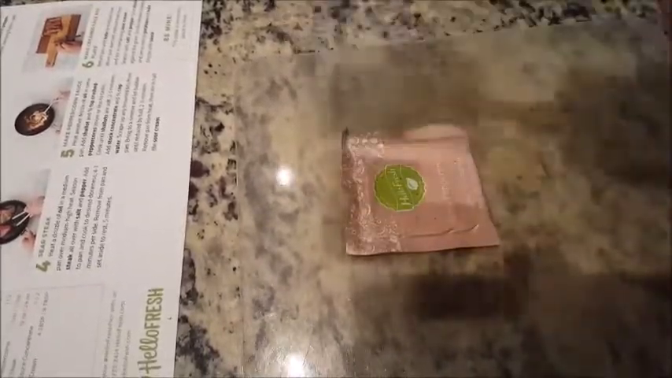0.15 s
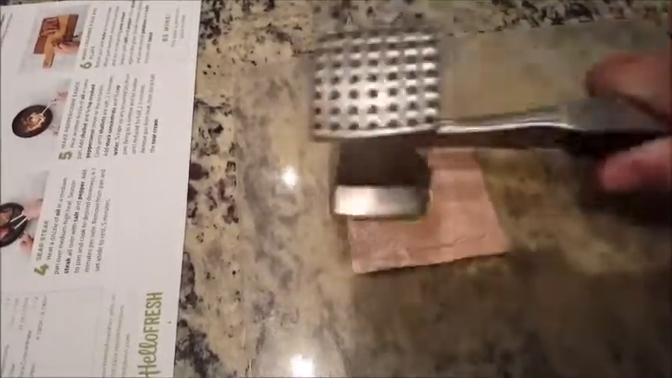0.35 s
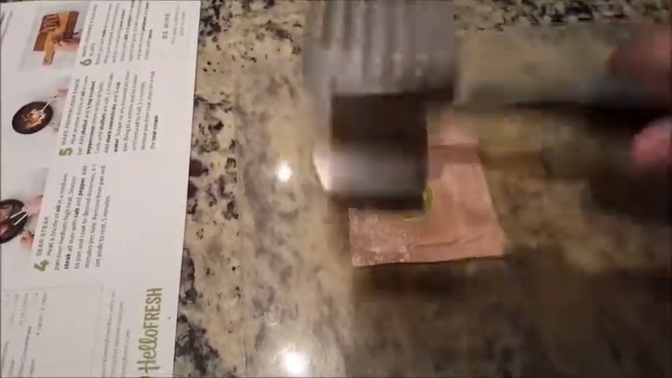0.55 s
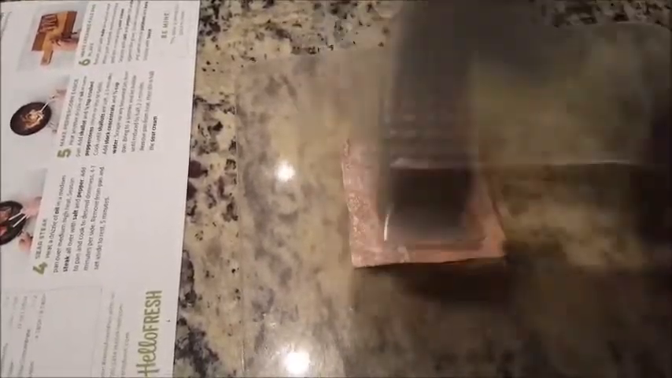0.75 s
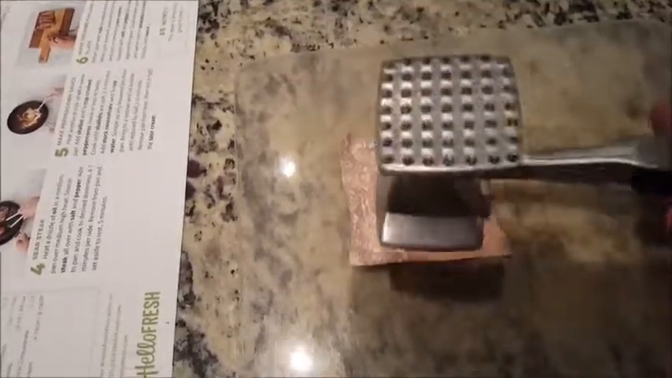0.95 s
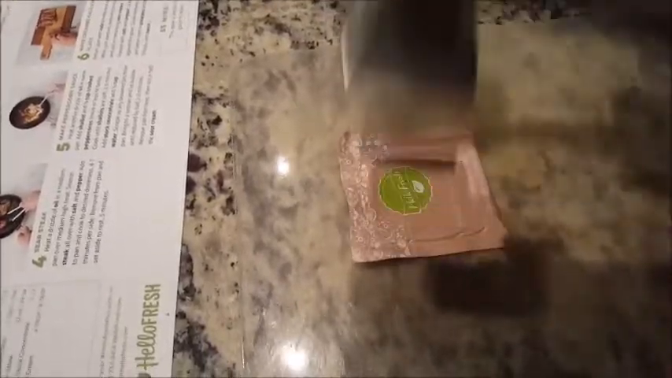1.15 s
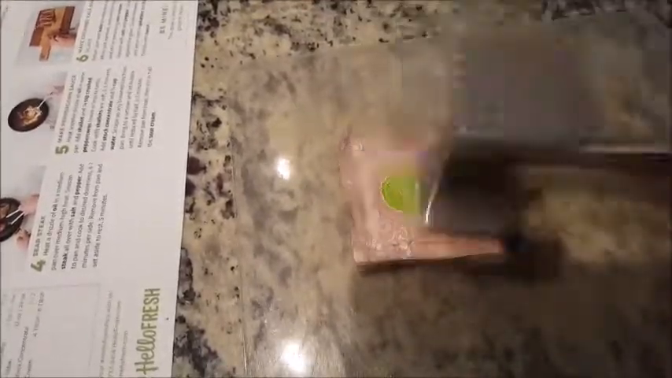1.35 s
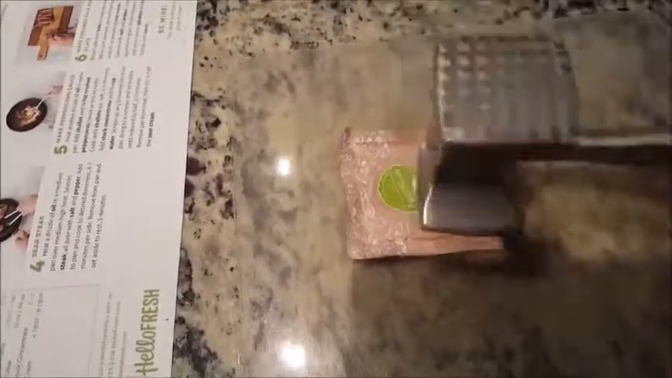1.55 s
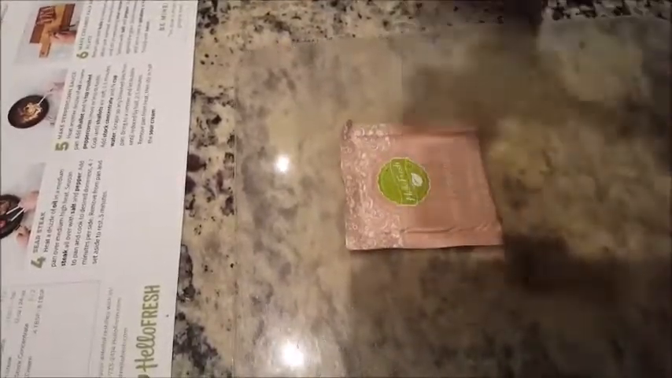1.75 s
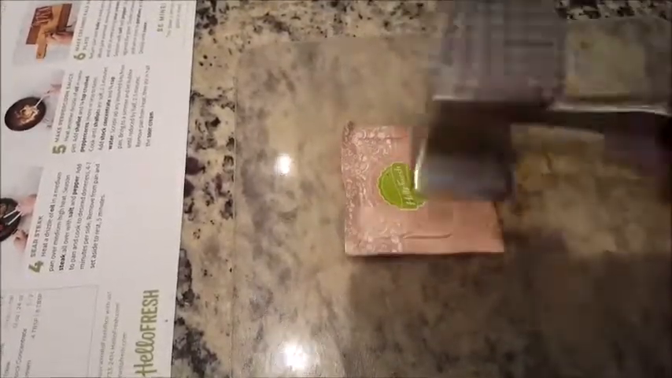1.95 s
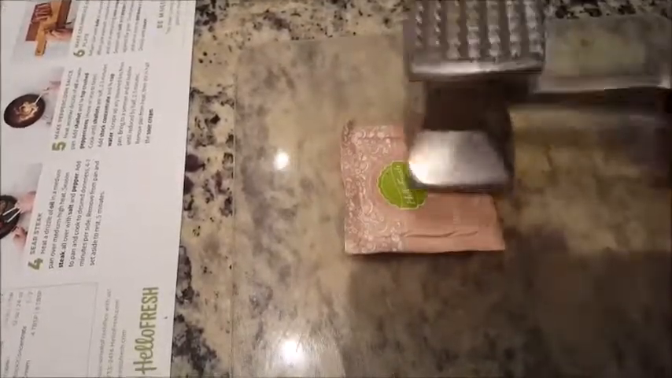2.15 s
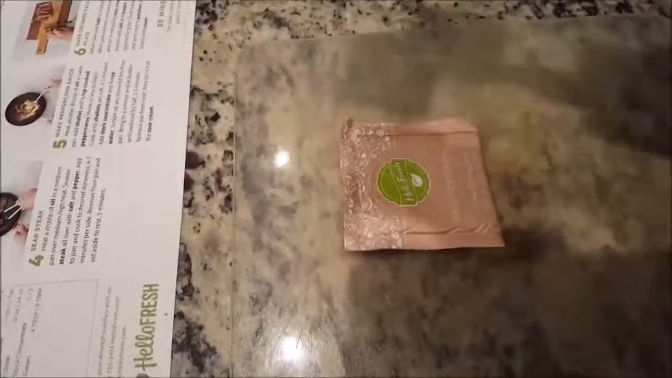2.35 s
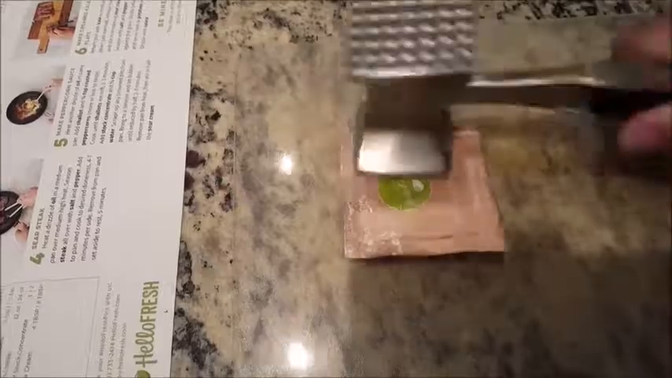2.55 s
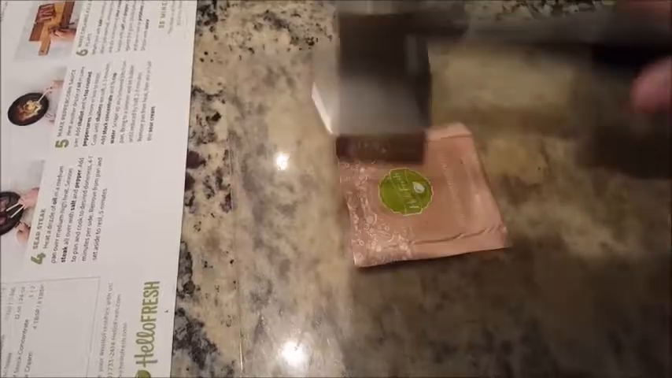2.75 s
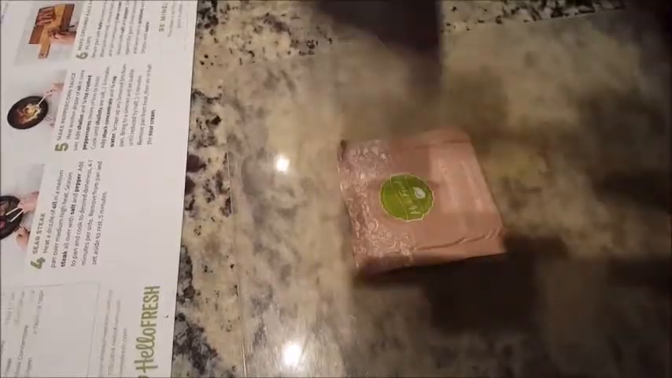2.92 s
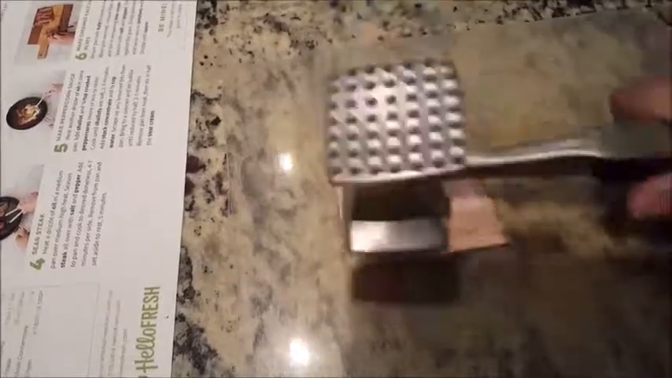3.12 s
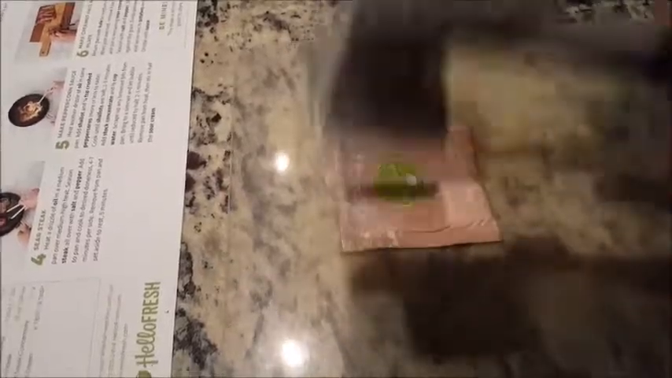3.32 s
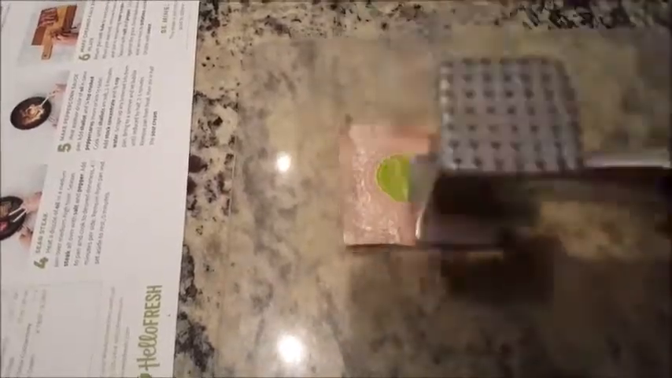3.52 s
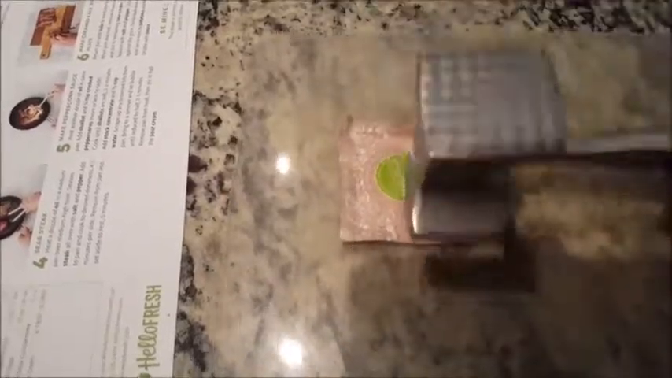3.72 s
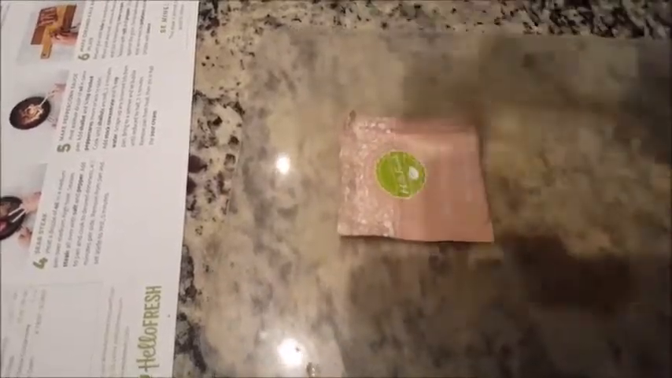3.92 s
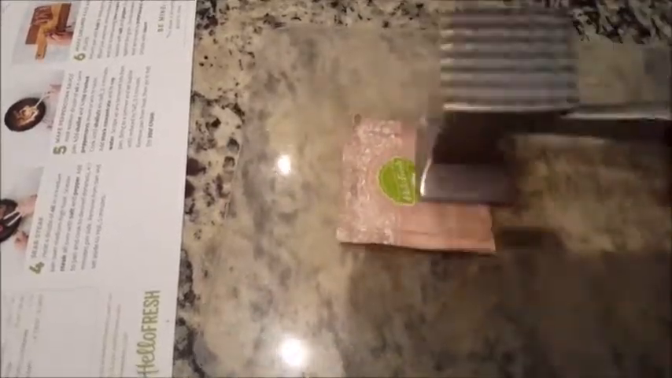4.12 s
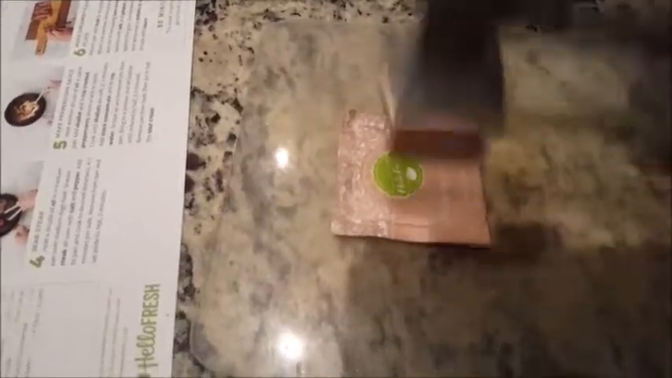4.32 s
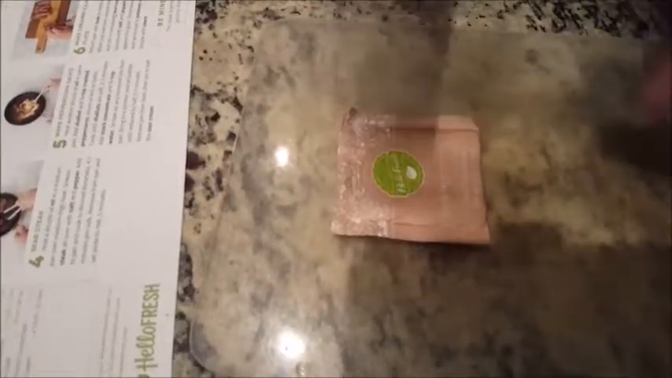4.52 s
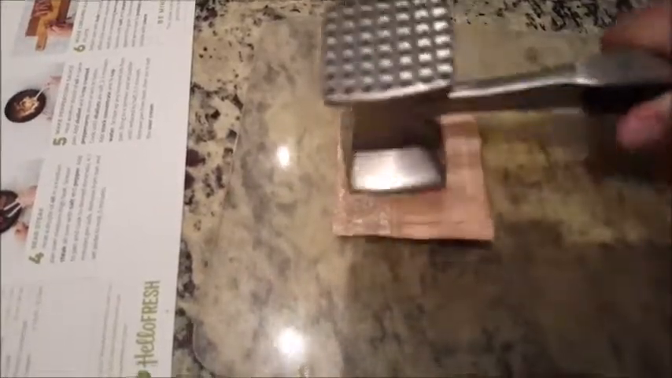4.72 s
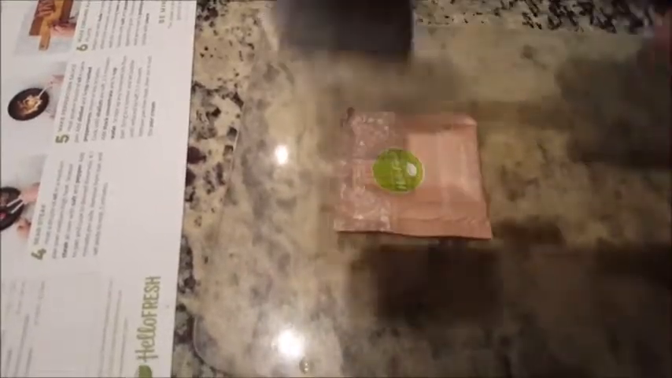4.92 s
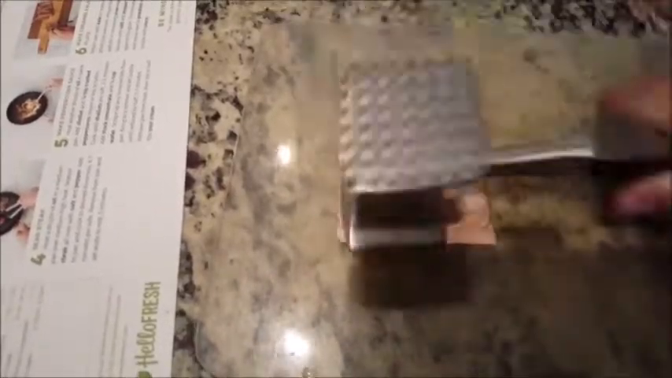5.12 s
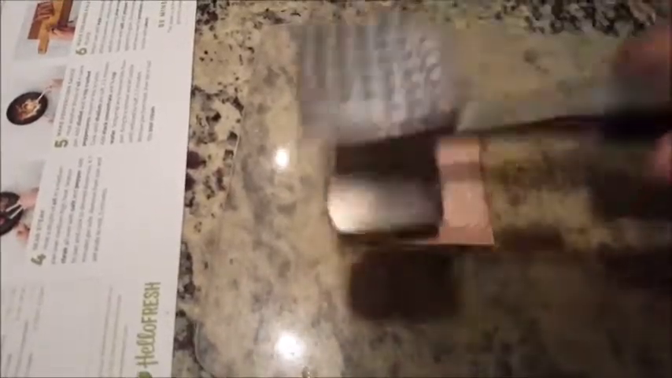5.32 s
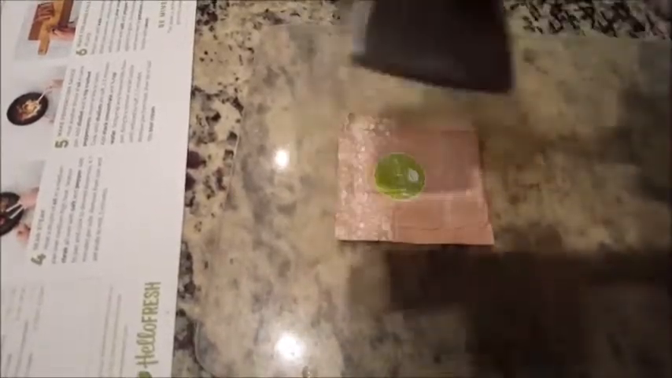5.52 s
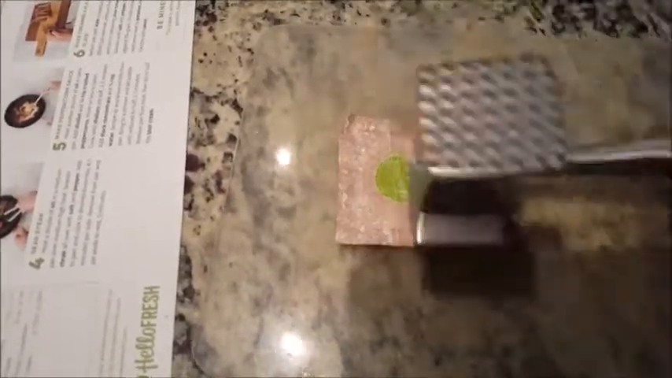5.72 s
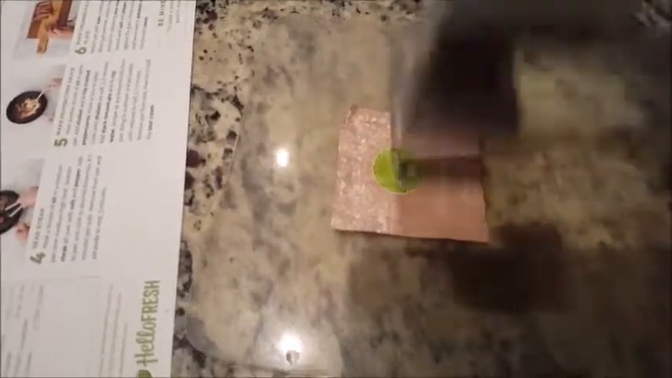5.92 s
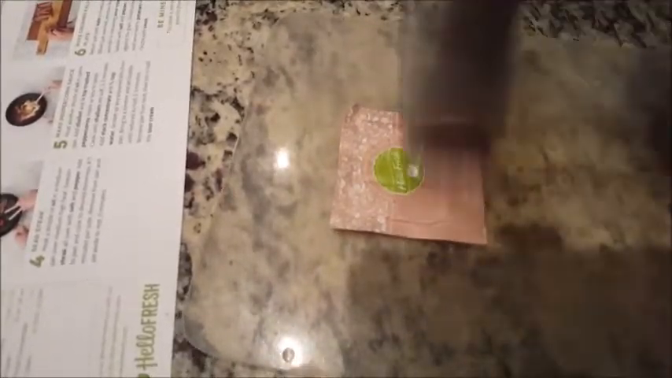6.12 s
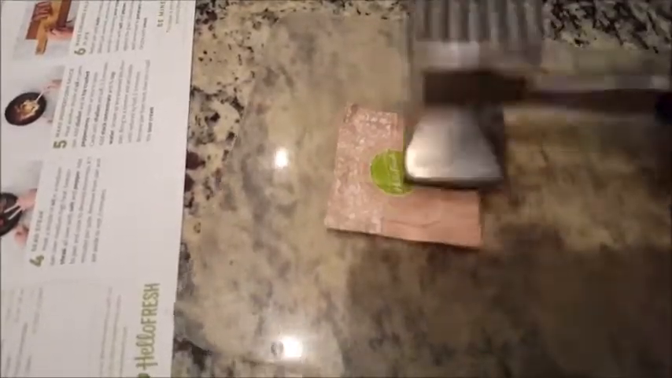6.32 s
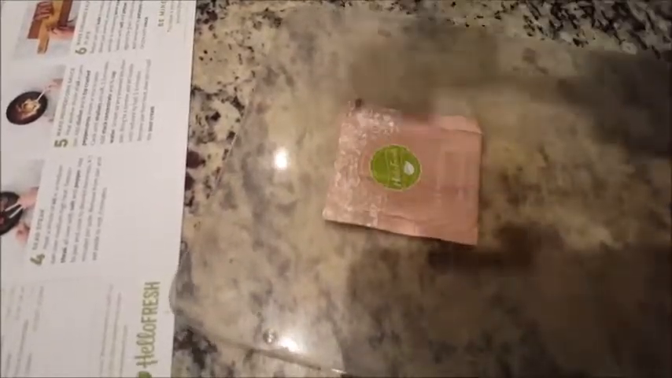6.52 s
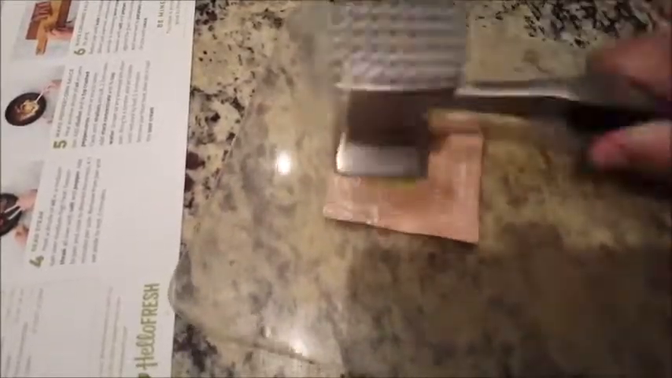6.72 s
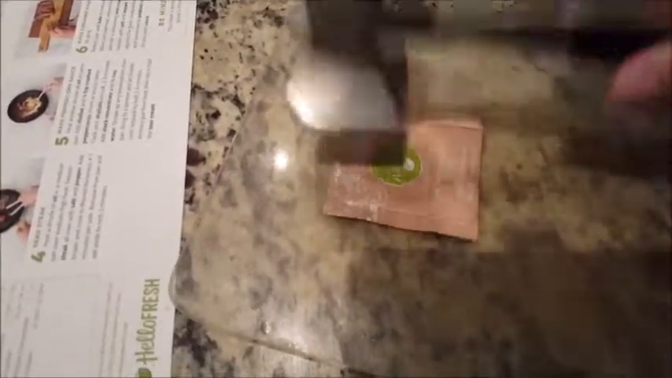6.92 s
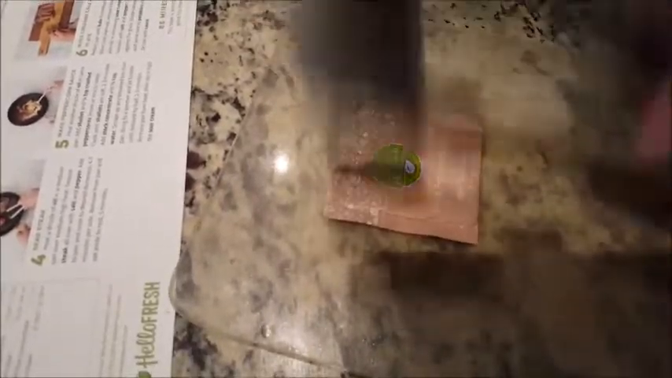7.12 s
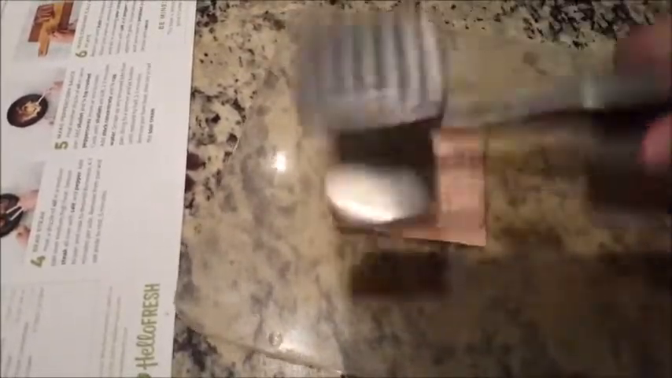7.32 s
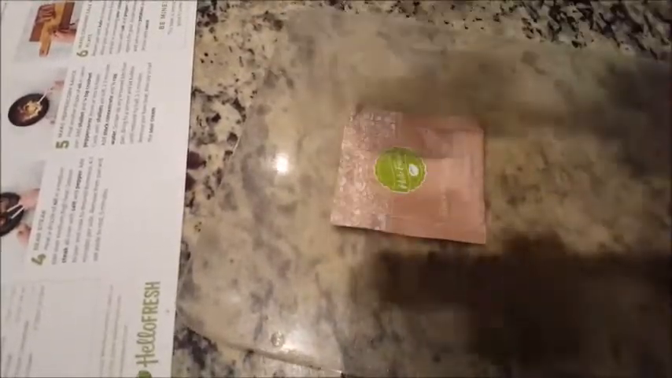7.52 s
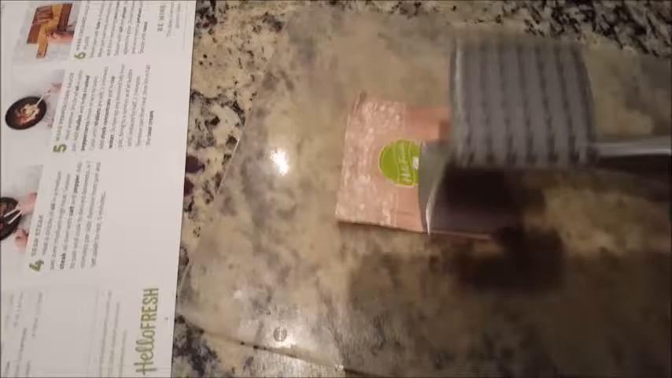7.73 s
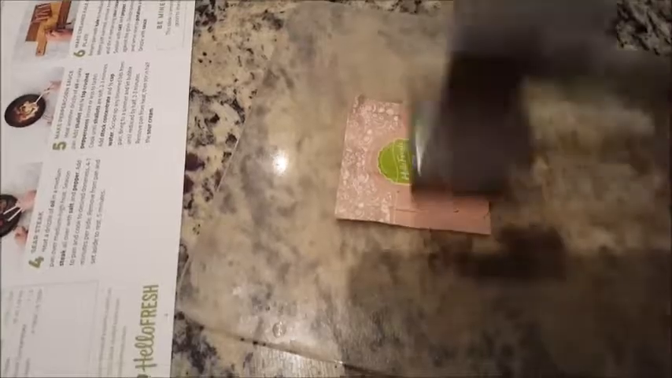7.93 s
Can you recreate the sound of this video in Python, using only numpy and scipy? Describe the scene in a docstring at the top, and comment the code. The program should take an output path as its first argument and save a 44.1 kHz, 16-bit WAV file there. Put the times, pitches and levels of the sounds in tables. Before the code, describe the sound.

Steady, heavy mallet blows crack peppercorns inside a paper packet on a stone slab, each knock ringing briefly in a bare, reflective kitchen.

```python
"""A metal mallet pounds a paper packet of peppercorns on a stone counter in a bare kitchen.
Each blow: filtered noise bursts give the squeezed packet and the cracking corns, two decaying sines the head.
The slab knocks in decaying mode pairs, and the room answers for half a second with reflections and dying noise.
Paper crackles, soft bumps, rumble and hiss lie beneath; two unlike microphone ports hear it, loudest peaks rounded.
"""
import sys
import numpy as np
from scipy import signal
from scipy.io import wavfile

SR = 44100
rng = np.random.default_rng(int(sys.argv[2]) if len(sys.argv) > 2 else 0)


def log_audio(samples):
    """Write samples as a 16-bit WAV file to the path given in sys.argv[1]."""
    # one column per channel
    frames = np.atleast_2d(samples).T
    # limit to full scale, then quantise
    limited = np.clip(frames, -1, 1)
    pcm = np.round(limited * 32767).astype(np.int16)
    wavfile.write(sys.argv[1], SR, pcm)


N = 355446
LEAD = SR // 4  # samples run before the start, so that an earlier blow still echoes

# the two modes of the mallet head, low then high: pitch_hz, width_hz (of its peak in blow and echo), t60_s
HEAD_MODES = [(1626, 570, 0.0082), (2680, 1200, 0.0069)]
# diffuse echo of the kitchen along frequency: pitch_hz, level_db, t60_s, left_right_likeness (0-1)
KITCHEN_ECHO = [(50.7, -12.5, .5, .9), (99, -6.5, 0.43, 0.97), (206, 0.5, 0.46, 1), (345, -11, 0.71, 0.7),
                (490, 0, 0.59, 0.3), (715, -6, 0.76, 0.7), (940, 1.5, 0.61, 0), (1490, -10.5, 0.72, .05),
                (1900, -11, 0.54, 1), (2690, -9, 0.62, .05), (3400, -19, 0.53, 0.03), (4460, -16.5, 0.6, 0),
                (7500, -16.5, 0.47, 0.5), (11000, -15.5, 0.38, 0), (14700, -23, 0.44, 0.26),
                (16000, -40, .3, .02)]
ROOM_DB, BUILD_UP_S = 8.5, 0.0034  # level and onset time shared by diffuse echo and modes


def amp(db):
    """Gain of a level in dB."""
    return 10 ** (np.asarray(db) / 20)


def band(x, low_hz, high_hz):
    """Butterworth band-pass."""
    edges = np.clip([low_hz, high_hz], 10, .45 * SR)
    return signal.sosfilt(signal.butter(2, edges, "band", fs=SR, output="sos"), x)


def ring(x, hz, t60):
    """Two-pole resonator: a unit click sets a decaying sine of height 1 ringing."""
    r = amp(-60 / (t60 * SR))
    w = 2 * np.pi * hz / SR
    return signal.lfilter([0, np.sin(w)], [1, -2 * r * np.cos(w), r * r], x)


def peak(x, hz, width_hz, db):
    """Peaking filter: lifts or dips the spectrum around one frequency."""
    a = amp(db / 2)
    w = 2 * np.pi * hz / SR
    q = np.sin(w) * width_hz / hz / 2
    middle = -2 * np.cos(w)
    return signal.lfilter([1 + q * a, middle, 1 - q * a], [1 + q / a, middle, 1 - q / a], x)


def unit_peak(x):
    """Each row scaled to a peak of 1."""
    return x / np.abs(x).max(axis=-1, keepdims=True)


def lay(shapes, seconds):
    """Short sounds placed on the time line, which starts LEAD samples early."""
    out = np.zeros(N + LEAD + SR)
    for shape, s in zip(shapes, seconds):
        at = LEAD + round(s * SR)
        out[at:at + len(shape)] += shape
    return out[:N + LEAD]


def floor():
    """Filtered noise: rumble and murmur of the house, microphone hiss and a faint band of high hiss."""
    low, murmur, hiss, thin = rng.standard_normal((4, 2, N + LEAD))
    rumble = amp(-44) * band(low[0], 30, 120)  # the same at both ports
    house = amp(-62) * band(murmur, 100, 900)
    high_hiss = amp(-79.5) * band(thin, 11800, 13000)
    return rumble + house + amp(-80) * hiss + high_hiss


def packet():
    """Paper unsticking or settling as swelling and fading band noise, and two soft bumps as low sine pulses."""
    # crackles between blows: start_s, level_db, centre_hz, rise_s
    rustles = [(.619, -46, 11000, .002), (1.84, -66.5, 9000, .01), (1.865, -60.5, 4700, 0.018),
               (2.787, -45, 10000, .002), (2.824, -51, 11000, .002), (3.323, -56, 11000, .002),
               (5.381, -52, 11000, .002)]
    # soft low bumps: start_s, level_db, pitch_hz
    bumps = [(0.776, -53, 172.6), (0.793, -45.5, 70)]
    t = np.arange(SR // 8) / SR
    noise = rng.standard_normal((len(rustles), len(t)))
    shapes, starts = [], []
    for n, (start, db, hz, rise) in zip(noise, rustles):
        swell = t / rise * np.exp(1 - t / rise)
        shapes.append(amp(db) * band(n * swell, hz / 1.4, hz * 1.4))
        starts.append(start)
    for start, db, hz in bumps:
        swell = t / 0.0093 * np.exp(1 - t / .008)
        shapes.append(amp(db) * np.sin(2 * np.pi * hz * t) * swell)
        starts.append(start)
    return lay(shapes, starts)


def diffuse():
    """Stereo impulse response of the kitchen: noise dying by third-octave band."""
    t = np.arange(SR) / SR
    hz, level_db, t60, alike = np.transpose(KITCHEN_ECHO)
    white = rng.standard_normal((2, 2, SR))
    edges = 40 * 2 ** np.arange(0, 9, 1 / 3)
    out = np.zeros((2, SR))
    for k, (low, high) in enumerate(zip(edges, edges[1:])):
        centre = np.log(low * high) / 2
        db, decay, c = (np.interp(centre, np.log(hz), column) for column in (level_db, t60, alike))
        mid, side = band(white[k % 2], low, high)  # neighbouring bands use different noise
        c = np.clip(c, 0, 1)
        stereo = np.sqrt(1 + c) * mid + np.sqrt(1 - c) * side * [[1], [-1]]
        out += amp(db - 60 * t / decay) * stereo
    return amp(ROOM_DB) * (1 - np.exp(-t / BUILD_UP_S)) * out


def resonances():
    """Two stereo impulse responses of decaying slab and room modes, one for each end of the packet."""
    # pitch of each slab or room mode: pitch_hz
    mode_hz = [89, 138, 221, 248, 294, 409, 457, 478, 519, 567, 587, 630, 647, 749, 776, 798, 859, 891, 920,
               968, 1020, 1149, 1185, 1270, 1320, 1515, 1580, 2120]
    # the same modes in order: level_db (before the common level), t60_s (before the cap below)
    mode_decays = [(-5.5, 0.48), (-11.5, 0.15), (-5.5, 0.51), (-0.5, 0.4), (-3.5, .62), (-2.5, 0.4),
                   (-6, 0.64), (-4.5, 0.49), (-5, 0.53), (-6.5, 1), (0, 0.63), (-2, 0.61), (-6.5, 0.88),
                   (0, 0.19), (6.5, 0.38), (-6, 0.49), (-8.5, 0.83), (-2, 1), (-5, 0.73), (-4.5, 0.59),
                   (-9, 0.91), (-0.5, .48), (-11, .5), (-14.5, 0.16), (-16, 0.41), (-18.5, 0.34),
                   (-9, 0.58), (-14.5, 0.6)]
    common_db, longest_t60_s = -20.5, .68
    t = np.arange(SR) / SR
    hz, alike = np.transpose(KITCHEN_ECHO)[[0, 3]]
    out = np.zeros((2, 2, SR))
    chance = rng.uniform(-1, 1, (len(mode_decays), 5))
    for f, (db, t60), (phase, way, split, turn, lean) in zip(mode_hz, mode_decays, chance):
        # short waves reach the ports out of step
        likeness = np.clip(np.interp(f, hz, alike), 0, 1)
        apart = np.sign(way) * np.arccos(likeness)
        angle = 2 * np.pi * f * t + np.pi * phase + apart / 2 * np.array([[1], [-1]])
        # a close weaker mode, up to 9 Hz away, makes it beat
        twin = 0.62 * np.sin(angle + 2 * np.pi * 9 * split * t + np.pi * turn)
        mode = amp(db - 60 * t / min(t60, longest_t60_s)) * (np.sin(angle) + twin)
        # each end favours other modes
        out += amp(6.4 * lean * np.array([1, -1]))[:, None, None] * mode
    return amp(ROOM_DB + common_db) * (1 - np.exp(-t / BUILD_UP_S)) * out


def reflect(x):
    """First reflections off cupboards and walls: delayed, sides swapped, duller than the direct sound."""
    # path of each reflection: delay_s, left_db, right_db (against the echo level)
    paths = [(.0080, -5, -2), (.0128, 0, 3), (.0185, -8, -7)]
    out = np.zeros_like(x)
    dull = band(x, 100, 13000)
    for delay, left_db, right_db in paths:
        lag = round(delay * SR)
        out[:, lag:] += amp([[left_db], [right_db]]) * dull[::-1, :-lag]
    return out


def coloured(x, thud_db, low_db, high_db, treble_db, sizzle_db):
    """How a blow lands sets its bass, the two head modes, the sizzle of breaking corns and the treble."""
    low_mode, high_mode = HEAD_MODES
    x = peak(x, 5100, 3500, sizzle_db)
    x = peak(x, 160, 300, thud_db)
    x = peak(x, *low_mode[:2], low_db)
    x = peak(x, *high_mode[:2], high_db)
    above = signal.lfilter(*signal.butter(1, 2500, "high", fs=SR), x)
    return x + (amp(treble_db) - 1) * above


def squeeze(noise, echo_db, seconds):
    """The packet is squeezed before the head lands: band noise rising exponentially, then cut off."""
    early, level_db = .010, -28  # s ahead of the blow; dB against the echo level
    t = np.arange(noise.shape[-1]) / SR
    rise = np.exp((t - early) / 0.0081) * (t < early)
    shapes = unit_peak(band(noise * rise, 200, 1500))
    return lay(amp(echo_db[:, None] + level_db) * shapes, seconds - early)


def mallet_head(burst, high_db):
    """The burst of cracking corns sets the two head modes ringing."""
    (low_hz, _, low_t60), (high_hz, _, high_t60) = HEAD_MODES
    return ring(burst, low_hz, low_t60) + .5 * amp(high_db[:, None]) * ring(burst, high_hz, high_t60)


def blows():
    """Cracks and head as sent straight to each port and to the walls, the squeeze, and clicks to feed the echo."""
    # every blow, the first before the start: start_s, direct_db, echo_db, low_mode_db, high_mode_db, treble_db
    blow_table = [(-0.2, -12, -17.5, 1, 0, -11.5), (0.3491, -2, -16, -2.5, 4, -2),
                  (0.8602, 1.5, -14, 6.5, 0, -14), (1.444, 0, -16, 5.5, -0.5, -10),
                  (1.9952, -6.5, -13, 0, -1.5, -8), (2.5579, -9, -10, 2, 2, -10),
                  (3.0745, -3, -11.5, 6, 1.5, -10), (3.5973, -0.5, -14.5, 9, -2.5, -15.5),
                  (4.132, -0.5, -15.5, 1, -4.5, -26), (4.652, -2.5, -13.5, 1.5, -2.5, -11),
                  (5.1728, -4, -13, 5, -3.5, -12), (5.7135, -8, -13.5, 7.5, -3, -31),
                  (6.2369, -6, -14.5, 5.5, -5, -29), (6.773, -1.5, -15, 4.5, 0, -8),
                  (7.2618, -3, -15.5, 7.5, -7, -32.5), (7.7831, -2.5, -13.5, 8.5, 3, -18)]
    s, direct, echo, low, high, treble = np.transpose(blow_table)
    port_lag_s = 0.00016  # the left port hears the blow first
    thud = -2.5 + 0 * s
    sizzle = 1.5 - 0.72 * s  # dB; fades as the corns turn to powder
    colours = np.transpose([thud, low, high, treble, sizzle])
    rung = -1.2 + 1.4 * direct + 0.44 * low  # dB; the head rings more on hard, square blows

    t = np.arange(SR // 10) / SR
    noise = rng.standard_normal((len(s), 4, len(t)))
    contact = (1 - np.exp(-t / 0.0036)) * np.exp(-t / 0.0015)  # corns give way in a few milliseconds
    straight, outward = [], []
    for k, side in enumerate((1, -1)):
        # each port hears the cracks partly its own way
        burst = (noise[:, k] + 0.55 * noise[:, 2]) * contact
        crack = np.array([coloured(b, *colour) for b, colour in zip(burst, colours)])
        head = unit_peak(mallet_head(burst, high))
        sound = amp(direct[:, None]) * unit_peak(crack) + amp(rung[:, None]) * head
        straight.append(lay(sound, s - side * port_lag_s / 2))
        outward.append(lay(amp(echo[:, None]) * unit_peak(crack + 0.17 * head), s))

    # the echo pattern shifts with the landing spot, between the two ends of the packet
    spot = rng.uniform(0, np.pi / 2, len(s))
    click = 1. * (t == 0)
    feed = np.array([amp(db) * coloured(click, *colour) for db, colour in zip(echo, colours)])
    feeds = [lay(share[:, None] * feed, s) for share in (np.cos(spot), np.sin(spot))]
    return np.array(straight), np.array(outward), squeeze(noise[:, 3], echo, s), feeds


def microphone_ports(left, right):
    """Each microphone port has its own resonances, heard as peaks and dips in the upper range."""
    # resonances of the left port: centre_hz, width_hz, level_db
    left_port = [(9000, 870, 4.5), (11300, 2700, -6)]
    # resonances of the right port: centre_hz, width_hz, level_db
    right_port = [(5840, 2060, 14), (9500, 5000, -9.5), (13490, 1100, 8)]
    for mode in left_port:
        left = peak(left, *mode)
    for mode in right_port:
        right = peak(right, *mode)
    return np.array([left, right])


def scene():
    """Blows, their echo, the packet and the floor, coloured by each microphone port."""
    straight, outward, squeezed, feeds = blows()
    kitchen = [diffuse() + modes for modes in resonances()]
    echo = np.zeros((2, N + LEAD))
    for feed, response in zip(feeds, kitchen):
        echo += signal.fftconvolve(feed[None], response, axes=-1)[:, :N + LEAD]
    left, right = straight + reflect(outward) + squeezed + echo + packet() + floor()
    return microphone_ports(left, right)[:, LEAD:]


def record(dry):
    """The microphones lose deep bass and top treble; peaks are rounded, the top is cut."""
    low_hz, high_hz, cutoff_hz = 65, 15600, 16860
    heard = band(band(dry, low_hz, high_hz), 20, high_hz)
    rounded = np.tanh(heard)
    return signal.sosfilt(signal.cheby2(12, 70, cutoff_hz, fs=SR, output="sos"), rounded)


dry = scene()
out = record(dry)
log_audio(out)
```